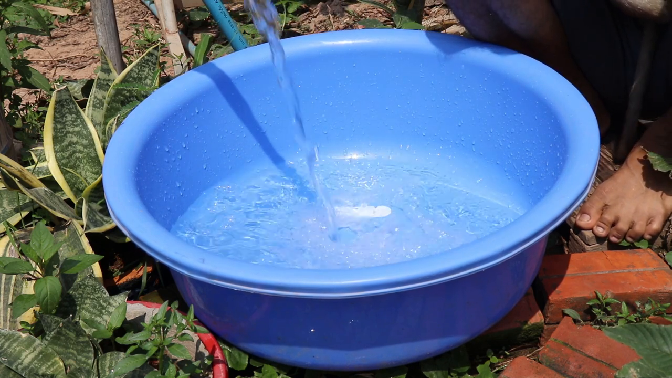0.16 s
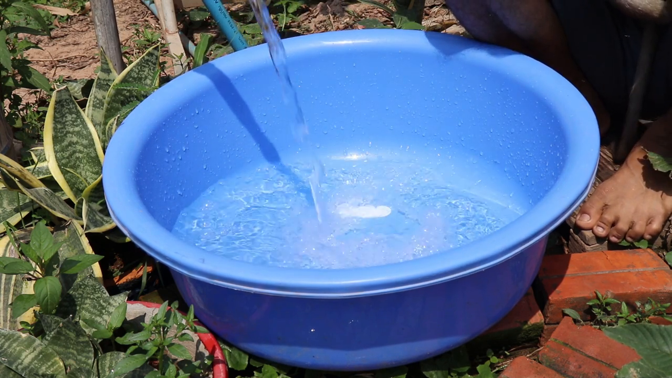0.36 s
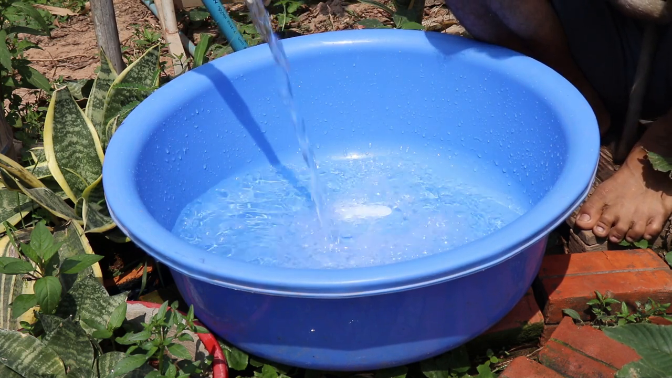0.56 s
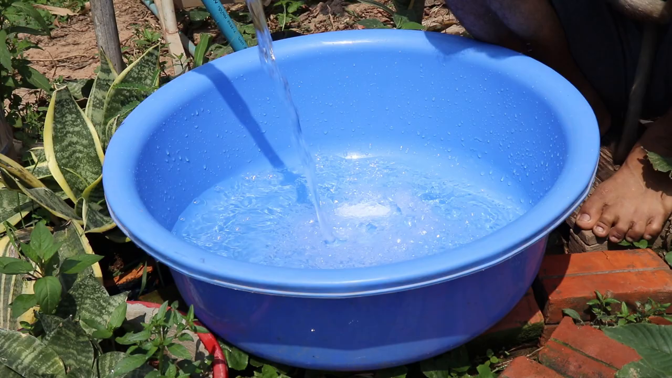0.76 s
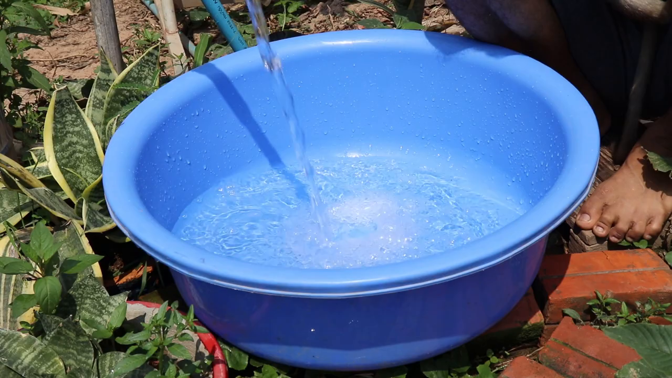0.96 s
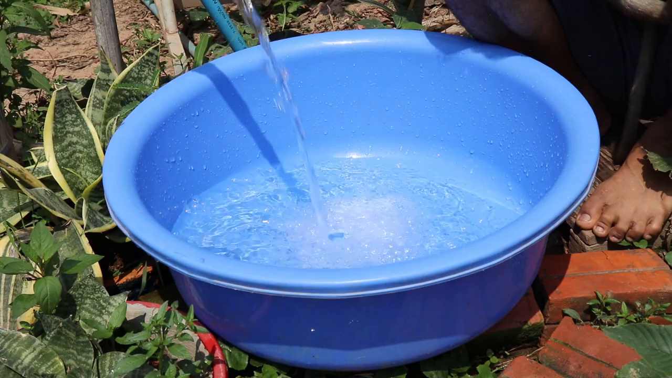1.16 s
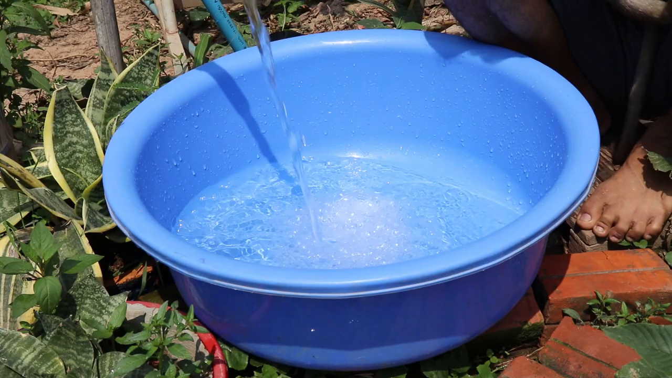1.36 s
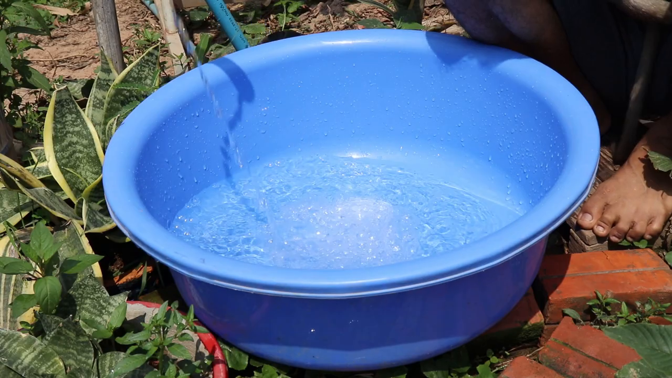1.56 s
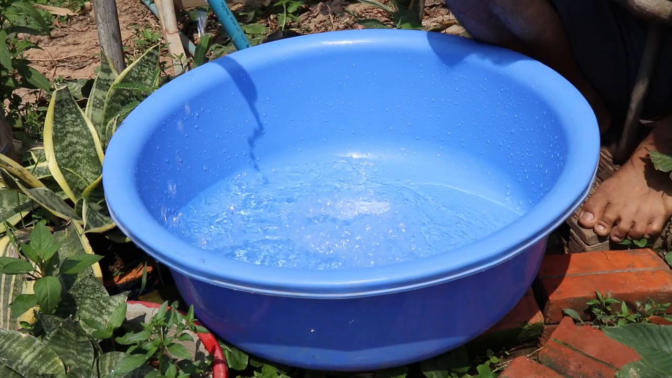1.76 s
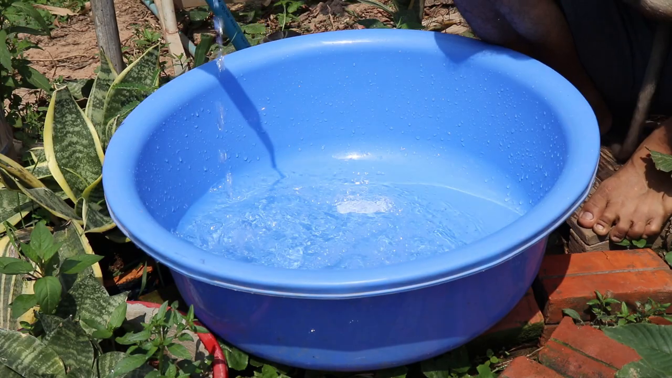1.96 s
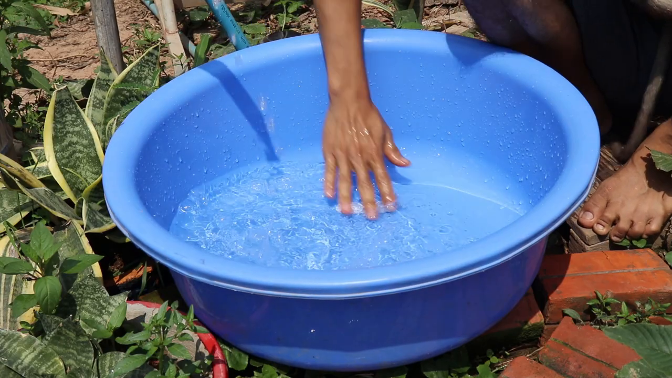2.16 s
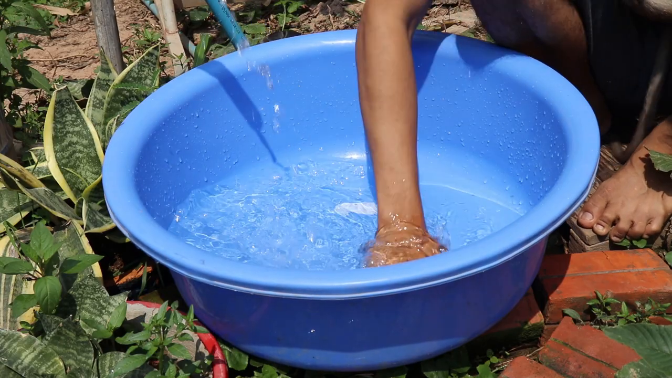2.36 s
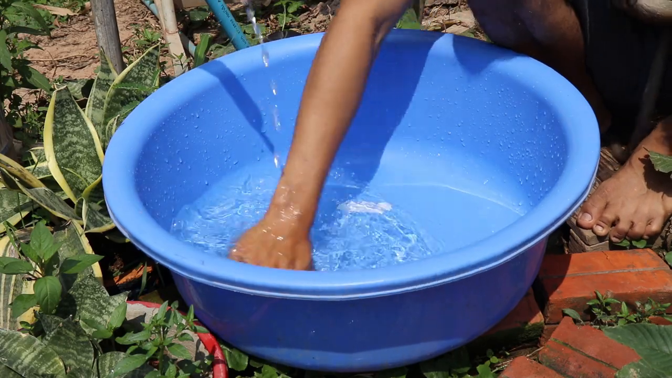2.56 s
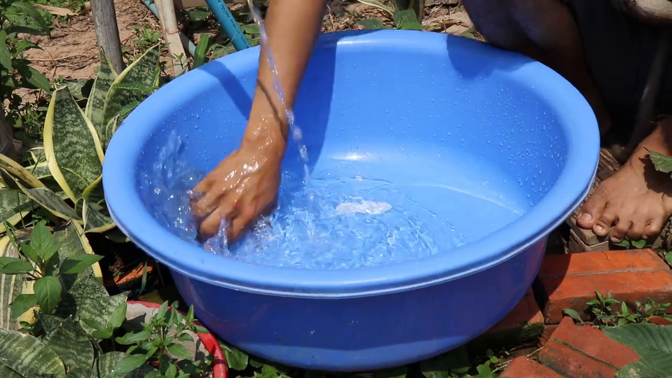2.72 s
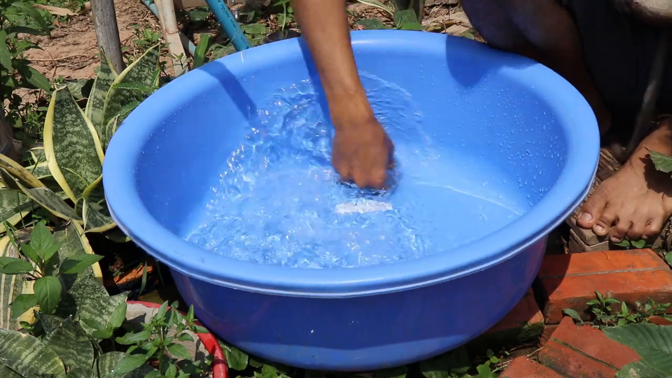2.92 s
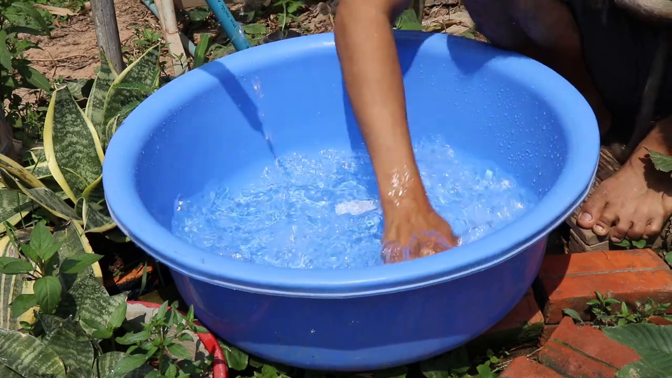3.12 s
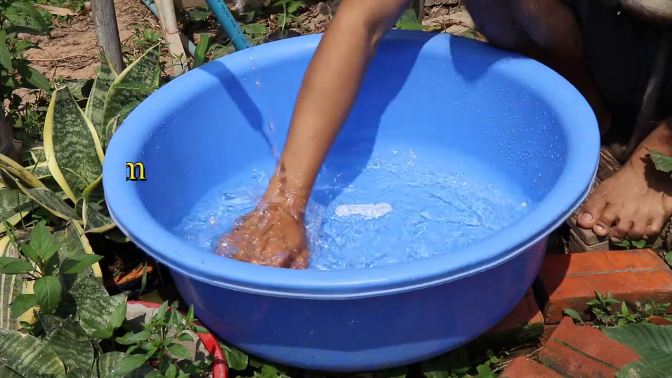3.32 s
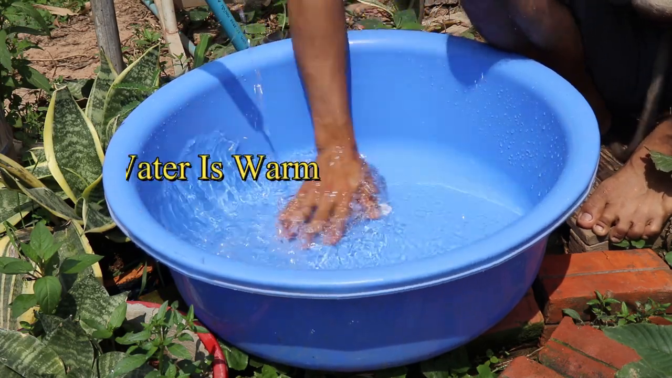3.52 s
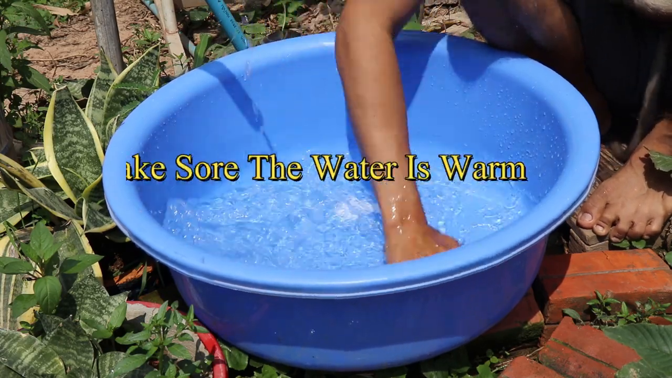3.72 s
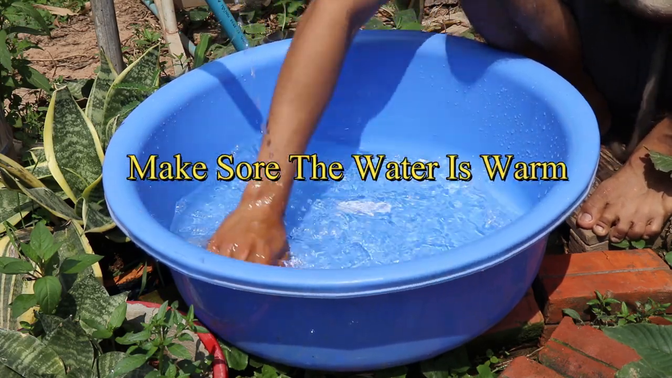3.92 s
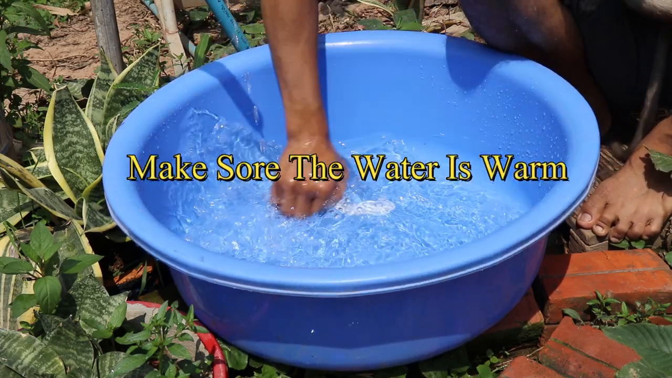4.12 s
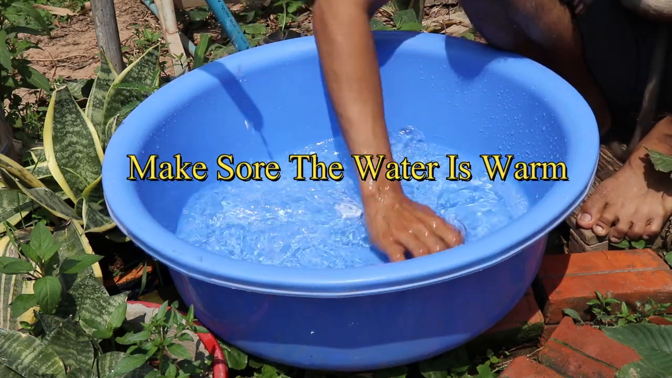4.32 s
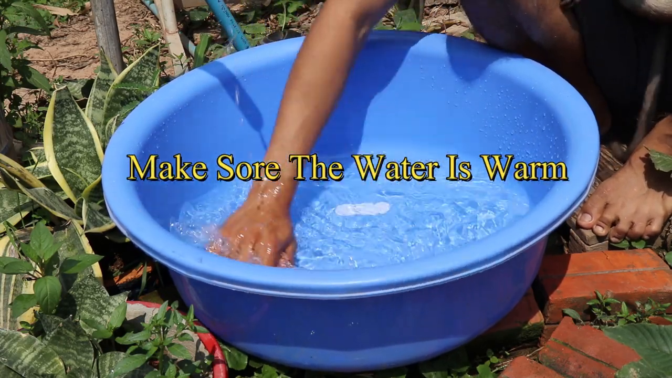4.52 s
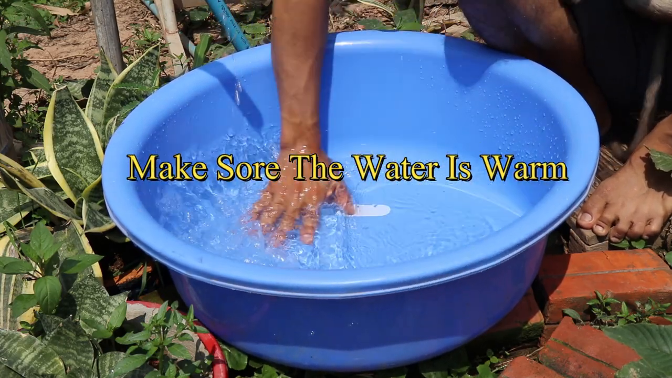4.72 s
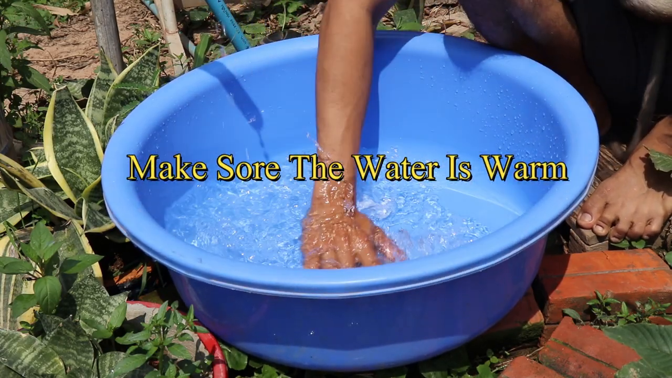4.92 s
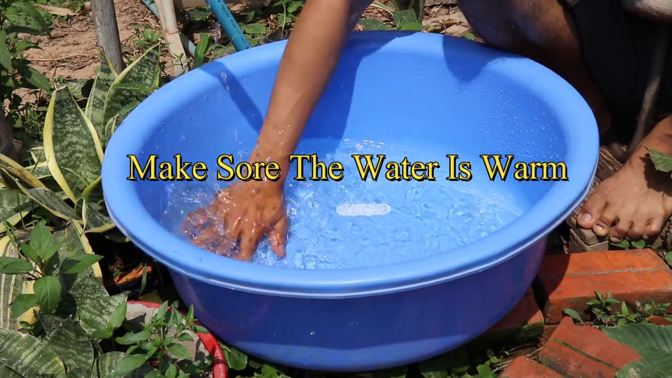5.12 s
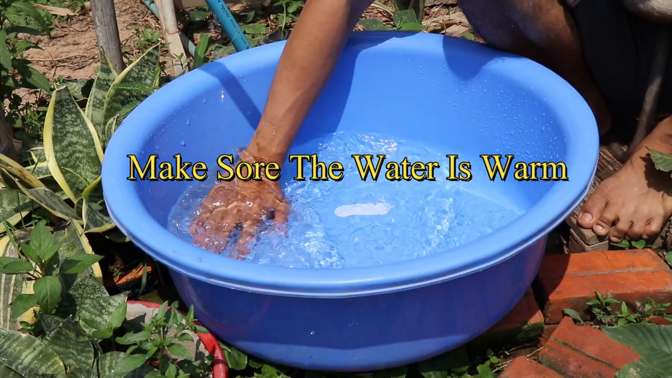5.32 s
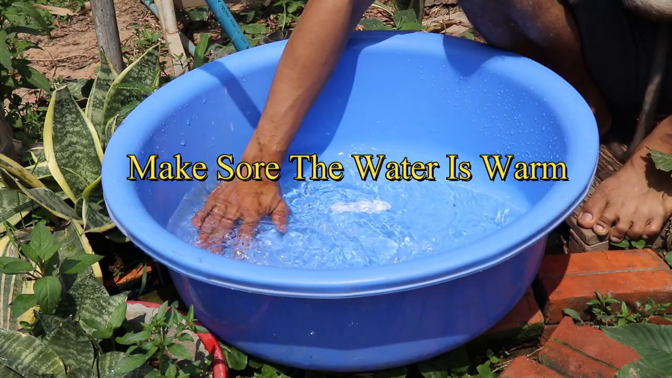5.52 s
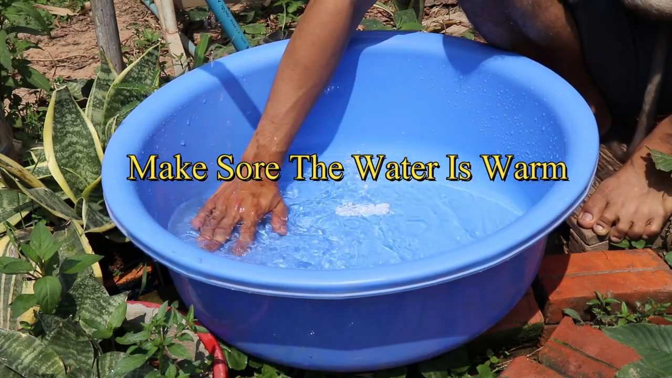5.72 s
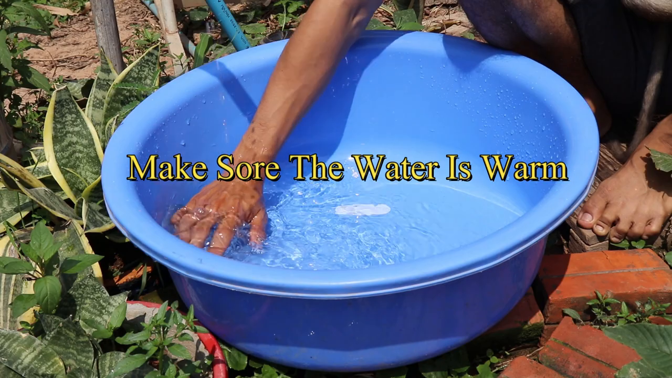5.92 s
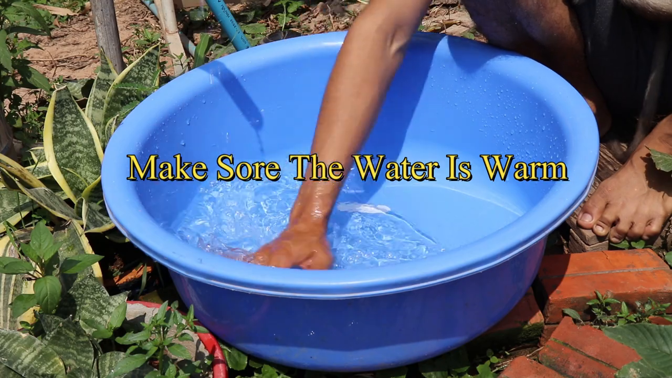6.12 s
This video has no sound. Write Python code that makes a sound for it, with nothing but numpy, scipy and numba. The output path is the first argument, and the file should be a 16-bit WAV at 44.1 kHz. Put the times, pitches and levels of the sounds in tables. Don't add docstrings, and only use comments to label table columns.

```python
import sys
import numpy as np
from scipy import signal
from scipy.fft import rfft, irfft, next_fast_len
from scipy.io import wavfile
from scipy.ndimage import uniform_filter1d, map_coordinates
from numba import njit

SR = 44100
rng = np.random.default_rng(int(sys.argv[2]) if len(sys.argv) > 2 else 0)


def generate_wav(signal):
    frames = np.transpose(np.atleast_2d(signal))
    scaled = np.clip(frames, -1, 1) * 32767
    pcm = np.round(scaled).astype(np.int16)
    wavfile.write(sys.argv[1], SR, pcm)


def field_ratio(decibels):
    return 10 ** (np.asarray(decibels, dtype=float) / 20)


N = 272097

# t/s, level/dB
FALLING_WATER = [(0.0, -22), (1.0, -23.5), (1.74, -25), (1.83, -38.5), (2.06, -40), (2.3, -36),
                 (2.35, -30.5), (2.44, -39.5), (2.54, -32), (2.73, -34.5), (2.85, -26.5), (3.3, -29),
                 (4.14, -29.5), (4.36, -36.5), (5.05, -29), (5.34, -42), (5.95, -49.5), (6.17, -43)]
# t/s, gurgle level/dB, boom level/dB
WAVES = [(0.345, -25, -32), (0.7, -43, -27), (1.01, -40, -23.5), (1.12, -45, -21), (1.42, -19, -34),
         (1.65, -48, -34), (2.02, -55, -42), (2.07, -54, -31), (2.19, -53, -35.5), (2.35, -38, -30),
         (2.385, -43, -54), (2.845, -20, -24.5), (2.95, -25.5, -54), (3.1, -27, -39), (3.277, -21, -28),
         (3.56, -28, -46), (3.7, -26, -36), (3.88, -29, -31.5), (4.05, -31, -54), (4.31, -53, -41),
         (4.638, -25, -28.5), (4.68, -45, -53), (5.0, -30.5, -40), (5.14, -30, -39), (6.037, -36, -35),
         (6.16, -27, -47)]

# t/s, level/dB (peak), fizz f/Hz, body level/dB
STREAM_DROPS = [(0.088, -8, 4940, -23), (0.1147, -11.5, 4870, -21), (0.312, -10, 9080, -15),
                (0.382, -6.5, 8200, -13), (0.4234, -9, 8200, -15), (0.698, -5.5, 5500, -18),
                (0.7178, -16, 4180, -15), (1.0064, -7, 8440, -7), (1.0897, -4, 7850, -15),
                (1.263, -8, 6060, -14), (1.293, -8, 5260, -20), (1.3828, -7.5, 9200, 3),
                (1.4594, -6, 8300, -14), (1.612, -5, 5700, -5), (1.6545, -4, 6200, -22),
                (1.677, -9.5, 8230, -15)]
DRIBBLE_DROPS = [(1.755, -18, 9000, -21), (1.7723, -21, 3520, -21), (1.899, -16.5, 6140, -28),
                 (2.0336, -35, 4310, 17), (2.0617, -11, 4700, -10), (2.103, -15, 8300, -13),
                 (2.119, -10.5, 3670, -2), (2.158, -23, 5560, 5), (2.1865, -13.5, 9000, -9),
                 (2.2108, -23, 6270, -20), (2.231, -19, 6000, -19), (2.2549, -9.5, 9300, -27),
                 (2.282, -26, 8720, -7), (2.2986, -16, 8200, -26), (2.325, -11, 8540, -10),
                 (2.363, -20, 9300, 10.5), (2.3913, -18, 3600, -11), (2.449, -17, 5900, -15),
                 (2.488, -17.5, 7600, -15), (2.5448, -19, 7400, -19), (2.557, -17.5, 8110, -18),
                 (2.5702, -10.5, 7940, -24), (2.6117, -21.5, 7400, -15), (2.6588, -18, 8700, -1),
                 (2.6857, -16, 4960, -17), (2.728, -15.5, 9200, -14), (2.763, -17, 5200, -9),
                 (2.769, -16.5, 4300, 10)]
HAND_DROPS = [(2.8697, -23, 3600, 4), (2.941, -17, 8940, -6), (3.023, -15, 8700, -5),
              (3.0747, -13.5, 4570, -5), (3.164, -12.5, 3900, -6), (3.362, -17.5, 4870, -15),
              (3.561, -18, 4000, 11), (3.6277, -16, 3850, -3), (3.7785, -17, 3450, -8),
              (3.8168, -12, 3450, -8), (3.8689, -18, 8060, 10.5), (3.9313, -18.5, 4190, -3),
              (3.968, -17, 9000, -20), (3.9742, -9, 8350, -12), (4.512, -13.5, 5230, -12),
              (4.5816, -18, 5500, -15), (4.656, -25, 3700, 16), (4.705, -14, 7900, -14),
              (4.778, -16, 9170, -14), (4.878, -12, 7040, 3), (4.933, -13, 7900, -14),
              (4.9795, -14, 8400, 0), (5.015, -16, 4030, -12), (5.117, -14, 3870, -15),
              (5.217, -21, 3320, -7)]
LAST_DROPS = [(5.373, -25, 7500, -14), (5.391, -23, 4900, -17), (5.4406, -27.5, 5770, -18),
              (5.517, -23, 4600, -25), (5.54, -20, 9260, -22), (5.5806, -27, 3380, 3),
              (5.656, -22.5, 6500, -8), (5.681, -18, 9000, -15), (5.7023, -25, 8800, -15),
              (5.738, -22, 8800, -19), (5.816, -28, 3900, -13), (5.8746, -27, 3670, -29),
              (5.9323, -14, 7400, -34), (5.9716, -29, 9000, -18), (6.0035, -33, 4580, -9),
              (6.065, -21, 7500, -2), (6.0889, -29, 6070, -12), (6.1396, -22, 8660, 0)]
# t/s, level/dB (peak), fizz f/Hz
LIGHT_DROPS = [(0.0583, -21, 8900), (0.189, -12.5, 4250), (0.202, -9.5, 4250), (0.2485, -14, 4200),
               (0.2739, -14.5, 5640), (0.2932, -22, 7560), (0.472, -15, 4200), (0.6115, -21, 4810),
               (0.6325, -15, 9100), (0.6576, -14.5, 9250), (0.783, -8.5, 8400), (0.8034, -14, 5740),
               (0.8295, -20, 8600), (0.854, -14.5, 3960), (0.934, -18, 8140), (0.9921, -15, 8840),
               (1.1456, -12, 8650), (1.1623, -15, 5400), (1.1967, -10.5, 7440), (1.2388, -15, 5430),
               (1.314, -16, 6060), (1.3399, -14, 8740), (1.362, -8.5, 8600), (1.403, -15, 8670),
               (1.504, -18, 7170), (1.523, -14.5, 5200), (1.7043, -16, 5540), (1.8585, -22.5, 5170),
               (1.983, -23, 6300),
               (2.8998, -16, 3760), (2.9213, -15.5, 5270), (2.9513, -17, 8830), (2.9951, -23, 4150),
                    (3.045, -17, 5060), (3.1794, -22, 4200), (3.2485, -25, 3630), (3.2765, -20, 8700),
                    (3.324, -22, 3790), (3.341, -16, 5240), (3.3715, -12.5, 5270), (3.4786, -23, 3520),
                    (3.6875, -18, 9070), (3.7335, -30, 3900), (3.949, -18, 5700), (4.114, -20, 8450),
                    (4.142, -21, 4990), (4.1779, -25, 4300), (4.196, -20, 8900), (4.288, -18.5, 4550),
                    (4.3316, -22, 8890), (4.357, -19, 8060), (4.3844, -22, 6760), (4.4503, -23, 9000),
                    (4.477, -27, 4100), (4.4928, -20, 5050), (4.593, -22, 3900), (4.6284, -21, 7910),
                    (4.7446, -20, 8680), (4.907, -22, 7680), (4.9852, -9, 7540), (5.6111, -27, 7940),
                    (5.8506, -33, 4650), (5.9534, -33, 7840), (6.11, -32, 7440)]
# t/s, level/dB (peak), f/Hz
FLAT_DROPS = [(0.3441, -3, 2000), (1.2632, 0.5, 1730), (1.9555, -11.5, 650), (2.018, -9, 500),
              (2.0614, -2, 1740), (2.184, 2, 1780), (2.9216, 1, 2010), (3.0752, -6, 1840),
              (4.6298, -5, 1490), (4.669, -2, 905), (4.979, -4.5, 2100), (6.1529, -8, 2270)]
# t/s, level/dB (peak)
FINE_DROPLETS = [(1.7724, -17), (1.8392, -26), (2.0328, -27), (2.3306, -21), (2.4259, -22), (2.574, -16),
                 (3.031, -18), (3.231, -22), (3.706, -21), (4.339, -24), (4.6012, -17.5), (4.9337, -21),
                 (5.0659, -21), (5.5144, -40), (5.9718, -31), (6.0018, -27)]

# t/s, level/dB (peak), f/Hz
STREAM_BUBBLES = [(0.034, -18, 2530), (0.344, -0.5, 1900), (0.482, -11, 2250), (0.663, -6.5, 507),
                  (0.736, -10, 1560), (0.854, -8, 1490), (0.954, -6, 2400), (1.008, 1, 1250),
                  (1.274, -6, 760), (1.417, -2, 1250), (1.489, -8, 766), (1.558, -5, 1940),
                  (1.604, -7, 1980)]
DRIBBLE_BUBBLES = [(1.789, -15.5, 3000), (1.956, -12, 1340), (2.018, -15, 750), (2.061, -5.5, 880),
                   (2.092, -12.5, 1590), (2.122, -14, 2760), (2.158, -11.5, 2550), (2.16, -13, 1770),
                   (2.185, -14, 946), (2.228, -16, 2970), (2.244, -14, 2180), (2.296, -17.5, 2570),
                   (2.348, -7.5, 1490), (2.369, -15, 1470), (2.385, -12, 840), (2.394, -20, 2870),
                   (2.415, -25, 1660), (2.476, -20, 1700), (2.513, -11, 1920), (2.55, -18, 2600),
                   (2.63, -13, 2170), (2.661, -10.5, 2060), (2.683, -23, 2400), (2.701, -16, 1810),
                   (2.756, -8, 1440)]
HAND_BUBBLES = [(2.83, -12.5, 3180), (2.869, -2, 852), (2.89, -8, 1080), (2.904, -7, 1150),
                (2.922, -5.5, 2050), (2.965, -12, 1070), (3.025, -10.5, 1490), (3.079, -5.5, 1040),
                (3.164, -10, 3960), (3.27, -9, 794), (3.316, -14, 1010), (3.403, -11.5, 2460),
                (3.561, -7, 2110), (3.645, -8.5, 1600), (3.711, -9.5, 1920), (3.765, -7.5, 1870),
                (3.815, -12, 3470), (3.853, -14.5, 1110), (3.885, -11, 777), (3.93, -11, 970),
                (4.045, -11, 1110), (4.12, -13, 2280), (4.071, -11, 890), (4.328, -10, 1230),
                (4.358, -7, 1450), (4.384, -6.5, 1370), (4.441, -4.5, 1147), (4.519, -1.5, 1290),
                (4.63, -10, 1030), (4.668, -4, 800), (4.778, -22, 2000), (4.835, -7, 1075),
                (4.949, -20, 1120), (4.979, -10, 2200), (5.135, -4, 1246)]
LAST_BUBBLES = [(5.275, -9.5, 840), (5.495, -13, 1670), (5.555, -18.5, 2420), (5.6, -16, 1870),
                (5.627, -19, 810), (5.658, -18.5, 2340), (5.742, -25, 1690), (5.82, -21, 843),
                (5.873, -18, 3570), (5.919, -22, 770), (6.02, -16, 1170), (6.041, -12.5, 1070),
                (6.066, -24, 2210), (6.1, -23, 1720), (6.118, -21, 2940), (6.152, -11, 2350)]
# t/s, level/dB (peak), f/Hz
PAIRED_BUBBLES = [
    (2.068, -13, 720),
    (2.073, -11.5, 3380),
    (5.493, -14, 970),
    (6.046, -11.5, 600),
]
# t/s, level/dB (peak), f/Hz
MORE_BUBBLES = [(0.114, -11, 740), (0.238, -8.5, 1510), (0.26, -6.5, 866), (0.293, -17, 708),
                 (0.386, -7.5, 1250), (0.401, -6.5, 3400), (0.419, -10, 2240), (0.531, -8, 2410),
                 (0.636, -4.5, 850), (0.775, -2.5, 760), (0.833, -13, 724), (0.874, -11, 1770),
                 (0.899, -8, 1510), (0.993, -14, 1270), (1.052, -12, 1720), (1.108, -14, 1600),
                 (1.136, -7, 1770), (1.196, -15, 1200), (1.351, -12, 2000), (1.529, -5.5, 1370),
                 (1.622, -5, 815), (1.667, -13, 1920), (1.723, -8, 2220),
                 (2.852, -17, 845), (2.939, -18, 1040), (3.172, -8.5, 1880), (3.217, -20, 2270),
                      (3.25, -11, 1320), (3.486, -12.5, 2190), (3.63, -21, 1530), (3.674, -12, 2040),
                      (3.961, -11, 1210), (4.018, -12, 1100), (4.169, -13, 2940), (4.205, -10, 1140),
                      (4.49, -14, 1430), (4.724, -21, 829), (4.868, -8.5, 840), (5.015, -26, 1620),
                      (5.075, -16, 1580), (5.118, -14, 1500), (5.163, -14, 1910), (5.203, -19, 920),
                      (5.216, -19, 1960), (5.235, -21, 1710), (5.322, -28, 783), (5.351, -24, 2830),
                      (5.367, -19, 844), (5.582, -26, 1730), (5.679, -21, 1750), (5.724, -30, 1650),
                      (6.134, -15, 2230),
                 (1.632, -7, 2230), (1.709, -16, 1950), (1.905, -21, 830), (1.976, -21, 2040),
                (2.24, -14, 4190), (2.41, -22, 4660), (2.421, -21, 3700), (2.534, -18, 4900),
                (2.631, -15, 4430), (3.181, -13, 1780), (3.269, -12, 2210), (3.41, -15, 3900),
                (3.581, -14, 3000), (3.71, -15, 3120), (3.853, -8, 1950), (4.192, -18, 1020),
                (4.234, -19, 3100), (4.506, -17, 1440), (4.896, -17, 1890), (4.916, -15, 1800),
                (4.997, -15, 830), (5.235, -23, 2840), (5.272, -24, 2510), (5.563, -22, 1350),
                (5.599, -23, 880), (5.625, -25, 1720), (5.739, -27, 4710), (5.818, -26, 1780),
                (6.122, -19, 1120), (6.15, -13, 1470)]

# f/Hz, width/Hz, level/dB
BASIN_MODES = [
    (326, 39, 2.5),
    (226, 150, -29),
    (422, 256, -4.5),
]
# f/Hz, width/Hz, level/dB
AIR_MODE = [
    (806, 78, 1),
]
# t/s (delay), level/dB
WALL_ECHOES = [
    (.0019, -13.5),
    (.0031, -18),
    (.0044, -10.5),
]
# f/Hz, width/Hz, level/dB
ECHO_DIPS = [
    (2740, 280, -4.5),
    (3800, 860, -7.5),
]
# f/Hz, level/dB (per Hz)
GARDEN_HISS = [
    (25, 0.5),
    (130, 1),
    (450, -7),
    (1400, -10),
    (3300, -33),
    (9000, -26.5),
    (16000, -17),
]
# t/s, level/dB
PUMP_HUM = [
    (0.0, -38.5),
    (0.45, -29),
    (0.69, -46),
    (1.03, -39.5),
    (2.47, -39.5),
    (3.86, -42.5),
    (4.05, -39),
    (6.17, -73),
]
# f/Hz, level/dB
MIC_RESPONSE = [(30, -15.5), (100, -7), (300, -6.5), (800, -4.5), (2400, 0), (3000, 2), (6700, -0.5),
                (8700, 3), (11300, -10), (14000, -9), (15900, -19)]

POUR_END_S, POUR_FADE_DB_PER_S = 1.72, 600
LAG_S = 0.000962


def churn():
    spatter_db, gurgle_db, boom_db, froth_db = stirring()
    lumps = wobble(80)

    spatter = swarm(2.9 * lumps + 0.6 * wobble(60), rate=1200, hz=6560, octaves=0.639, cycles=24.0,
                    spread_db=-0.5, rise=0.26, attack=0.051)
    ticks = swarm(lumps, rate=180, hz=6000, octaves=0.68, cycles=3.3,
                  spread_db=2.0, rise=0.12, attack=0.027)

    when, size = rng.random((2, round(75 * N / SR)))
    flecks = puffs(when * N / SR, -6 * np.log(size + 0.055), t60=0.019, attack=0.00022, low_hz=9000)
    flecks = steady(flecks, span=0.195)

    when, size = rng.random((2, round(170 * N / SR)))
    spray = puffs(when * N / SR, -5 * np.log(size + 0.14), t60=0.019, attack=0.00043, low_hz=4540)
    spray = steady(spray, span=0.14)

    gurgle = swarm(0.6 * lumps + 0.27 * wobble(37), rate=550, hz=1250, octaves=0.588, cycles=20.9,
                   spread_db=1.5, rise=0.884, attack=0.054)
    gurgle = filtered(gurgle, lambda f: 1 + resonances(AIR_MODE)(f))
    froth = swarm(2.6 * lumps, rate=1100, hz=2174, octaves=0.58, cycles=18.2,
                  spread_db=1.5, rise=0.33, attack=0.044)

    thuds = rng.standard_normal(N) * field_ratio(1.64 * lumps + 2.45 * wobble(31))
    boom = steady(filtered(thuds, lambda f: resonances(BASIN_MODES)(f) * f * f / (f * f + 130 ** 2)))

    mix = field_ratio(spatter_db - 2.5) * (0.5 * ticks + 0.64 * spatter + 0.86 * spray)
    mix += field_ratio(0.75 * spatter_db - 12.5) * flecks
    mix += field_ratio(gurgle_db) * gurgle + field_ratio(froth_db) * froth
    return mix + field_ratio(boom_db + 5.5) * boom


def stirring():
    surge_rise, gurgle_fall, boom_fall = 800, 122, 177
    flow_db, = curves(FALLING_WATER)
    pour_db = slope(POUR_END_S, 0, POUR_FADE_DB_PER_S)
    pour_boom_db = slope(1.675, 0, 252) - 28
    hand_db = -32 + slope(2.724, surge_rise, 0) + slope(5.07, 0, 63)
    gulps = [db + slope(s, surge_rise, gurgle_fall) for s, db, _ in WAVES]
    knocks = [db + slope(s, surge_rise, boom_fall) for s, _, db in WAVES]

    spatter_db = together(flow_db - 1.0, *[db - 11.5 for db in gulps])
    gurgle_db = together(flow_db - 28, pour_db - 29.5, hand_db, *gulps)
    boom_db = together(flow_db - 12, pour_boom_db, *knocks)
    froth_db = together(pour_db - 34, flow_db - 4)
    return spatter_db, gurgle_db, boom_db, froth_db


def smacks():
    s, db, hz, body_db = impacts()
    u = rng.standard_normal((len(s), 3))
    click = rings(s, 9250, 0.00055, db + 8.0, 0, 0.16)
    click += rings(s, 14700, 0.00065, db + 8.0 + 4 * u[:, 0], 0, 0.18)
    fizz_t60 = 20 * field_ratio(4.2 * np.minimum(u[:, 1], .5)) / hz
    fizz = rings(s - .0002, hz, fizz_t60, db + 4.5, 0.036, 0.12)
    fizz += rings(s + .0008, hz * field_ratio(1.13 * u[:, 2]), 9 / hz, db + 15.0, 0.049, 0.42)
    slap = rings(s, 1700 * field_ratio(2.0 * u[:, 0]), 0.0014, db + body_db + 4.0, -0.24, 0.031)
    return click + fizz + slap + puffs(s, db + 3.0, t60=0.011, attack=0.0029, low_hz=3520)


def impacts():
    s, db, hz, body_db = np.transpose(np.vstack([STREAM_DROPS, DRIBBLE_DROPS, HAND_DROPS, LAST_DROPS]))
    s1, db1, hz1 = np.transpose(np.array(LIGHT_DROPS))
    light_body_db = np.full(len(s1), -26.0)
    return np.r_[s, s1] + LAG_S, np.r_[db + 5, db1 + 5.5], np.r_[hz, hz1], np.r_[body_db, light_body_db]


def slaps():
    s, db, hz = np.transpose(FLAT_DROPS)
    return rings(s + LAG_S, hz, 2.4 / hz, db + 4.5, 0.11, 0.019)


def droplet_ticks():
    s, db = np.transpose(FINE_DROPLETS)
    click = rings(s, 14300, 0.0015, db + 19, 0, 0.1)
    return click + puffs(s, db + 8.5, t60=0.011, attack=0.0004, low_hz=12000)


def plops():
    s, db, hz = bubbles()
    u = rng.standard_normal((len(s), 3))
    t60 = 0.012 + 11 * field_ratio(4.0 * np.minimum(u[:, 0], 1)) / hz
    pop = rings(s, 0.83 * hz, 0.7 / hz, db + 3.0, 0, 0.096)
    twin_db = db - 11.5 + 1.5 * u[:, 2]
    twin = rings(s + 0.000926, hz * field_ratio(1.3 * u[:, 1]), 0.78 * t60, twin_db, 0.37, 0.033)
    return rings(s - .0003, 0.9466 * hz, t60, db + 0.5, 0.24, 0.21) + twin + pop


def bubbles():
    staged = [STREAM_BUBBLES, DRIBBLE_BUBBLES, HAND_BUBBLES, LAST_BUBBLES, PAIRED_BUBBLES]
    s, db, hz = np.transpose(np.vstack(staged))
    s1, db1, hz1 = np.transpose(np.array(MORE_BUBBLES))
    return np.r_[s, s1] + LAG_S, np.r_[db + 7, db1 + 5.5], np.r_[hz, hz1]


def basin(x):
    return x + sum(field_ratio(db) * np.roll(x, round(s * SR)) for s, db in WALL_ECHOES)


def standing(x):
    echo = filtered(x, lambda f: sum(resonances([dip])(f) for dip in ECHO_DIPS))
    return x - echo * field_ratio(slope(POUR_END_S, 0, POUR_FADE_DB_PER_S))


def garden():
    hiss = unit(filtered(rng.standard_normal(N), lambda f: field_ratio(along(GARDEN_HISS, f))))
    hum = steady(filtered(rng.standard_normal(N), resonances([(97.7, 1.4, 0)])), span=0.15)
    drone = steady(filtered(rng.standard_normal(N), resonances([(52, 5, 0)])), span=0.3)
    return field_ratio(-39.0) * hiss + field_ratio(-53.5) * drone + field_ratio(curves(PUMP_HUM)[0] - 5.5) * hum


def swarm(clump_db, rate, hz, octaves, cycles, spread_db, rise, attack):
    s = np.cumsum(rng.exponential(1, size=30000)) / rate
    u, e = rng.standard_normal((2, len(s))), rng.exponential(1, len(s))
    keep = s < N / SR
    s, u, e = s[keep], u[:, keep], np.minimum(e[keep], 4)
    pitch = hz * 2 ** (octaves * u[0])
    life = cycles * field_ratio(2.9 * u[1]) / pitch
    db = spread_db * e + clump_db[(s * SR).astype(int)]
    return steady(rings(s, pitch, life, db, rise, attack))


def rings(s, hz, t60, db, rise, attack):
    out, same = np.zeros(N), np.ones(len(s))
    pitch = np.clip(hz * same, 50, .4 * SR)
    add(out, np.clip(s, 0, None), pitch, t60 * same, field_ratio(db) * same, rise * same, attack, SR)
    return out


@njit
def add(out, s, hz, t60, gain, rise, attack, sr):
    for k in range(len(s)):
        first = int(s[k] * sr)
        for i in range(min(int(t60[k] * sr * .7), len(out) - first)):
            t = i / sr
            turn = 2 * np.pi * hz[k] * t * (1 + .5 * rise[k] * t / t60[k])
            swell = 1 - np.exp(-t / (attack * t60[k]))
            out[first + i] -= gain[k] * np.sin(turn) * np.exp(-6.9 * t / t60[k]) * swell


def puffs(s, db, t60, attack, low_hz):
    blows = np.bincount((s * SR).astype(int), field_ratio(db), N)[:N]
    t = np.arange(SR // 30) / SR
    fade = signal.fftconvolve(blows, field_ratio(-60 * t / t60) * (1 - np.exp(-t / attack)))[:N]
    return np.abs(fade) * unit(filtered(rng.standard_normal(N), lambda f: f * f / (f * f + low_hz ** 2)))


def resonances(modes):
    return lambda f: sum((-1) ** k * field_ratio(db) * 1j * f * w / (c * c - f * f + 1j * f * w)
                         for k, (c, w, db) in enumerate(modes))


def filtered(x, response):
    m = next_fast_len(N + SR // 2)
    return irfft(rfft(x, m) * response(np.fft.rfftfreq(m, 1 / SR)), m)[..., :N]


def steady(x, span=0.16):
    return x / np.sqrt(np.abs(uniform_filter1d(x ** 2, int(span * SR))) + 1e-12)


def unit(x):
    return x / np.sqrt(np.mean(x ** 2) + 1e-20)


def wobble(rate):
    knots = rng.standard_normal(int(N * rate / SR) + 4)
    return map_coordinates(knots, [np.arange(N) * rate / SR])


def slope(s, rise, fall):
    t = np.arange(N) / SR - s
    return np.where(t < 0, rise * t, -fall * t)


def together(*levels_db):
    return 10 * np.log10(sum(field_ratio(db) ** 2 for db in levels_db) + 1e-12)


def curves(rows):
    s, *cols = np.transpose(rows)
    return [np.interp(np.arange(N) / SR, s, c) for c in cols]


def along(points, hz):
    f, v = np.transpose(points)
    return np.interp(np.log(hz + 1), np.log(f + 1), v)


def scene():
    drops = basin(smacks() + plops() + slaps() + droplet_ticks())
    drops = filtered(drops, lambda f: (1j * f / (1j * f + 250)) ** 2)
    water = standing(field_ratio(-1.5) * drops + churn())
    return (water + garden())[None]


def roll_off(x):
    return signal.sosfilt(signal.butter(12, 16990, fs=SR, output="sos"), x)


def record(dry):
    x = filtered(dry, lambda f: field_ratio(along(MIC_RESPONSE, f)))
    x = x / (1 + np.abs(x / .95) ** 4) ** .25
    return roll_off(filtered(x, lambda f: f < 16100))


dry = scene()
out = record(dry)
generate_wav(out)
```